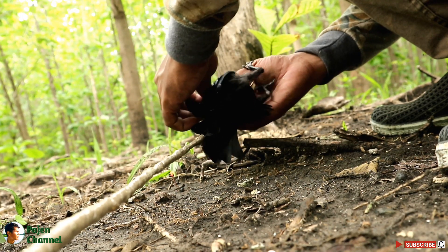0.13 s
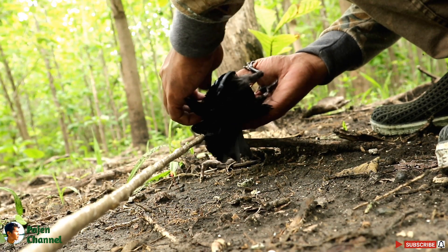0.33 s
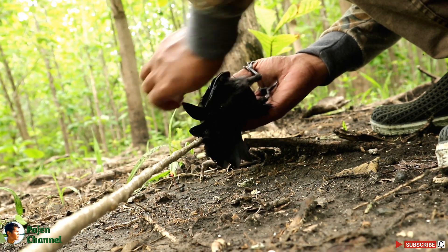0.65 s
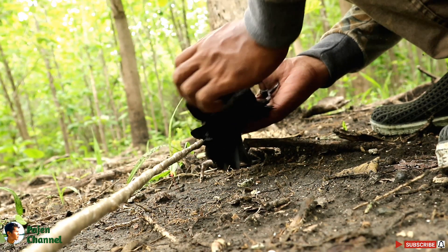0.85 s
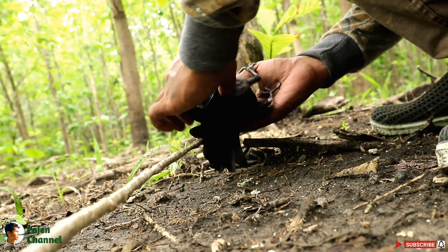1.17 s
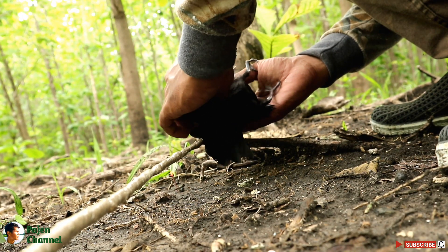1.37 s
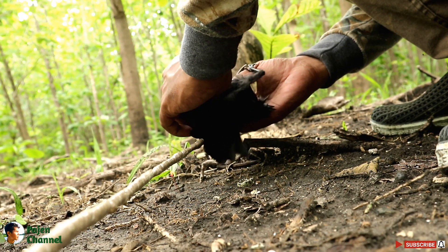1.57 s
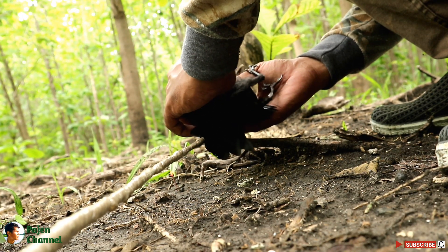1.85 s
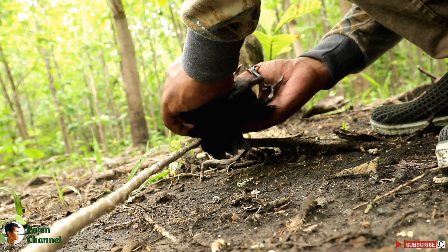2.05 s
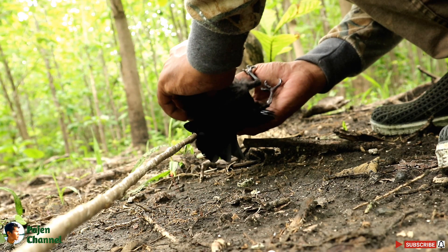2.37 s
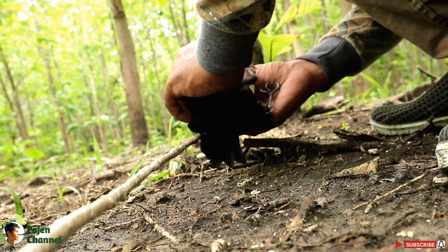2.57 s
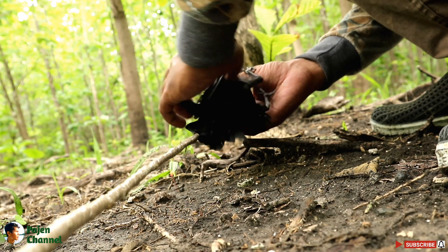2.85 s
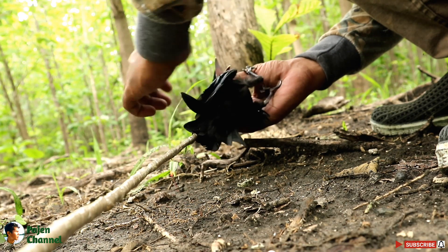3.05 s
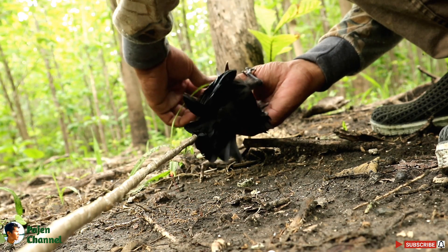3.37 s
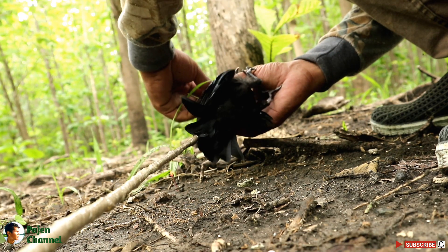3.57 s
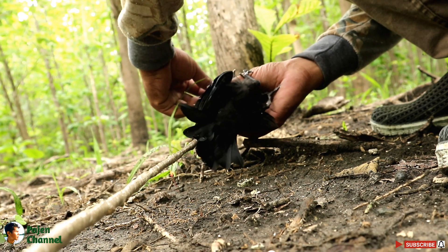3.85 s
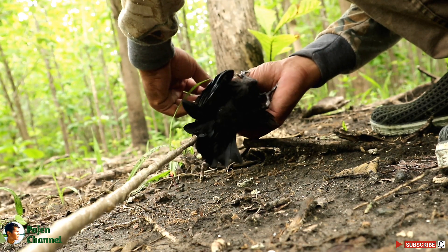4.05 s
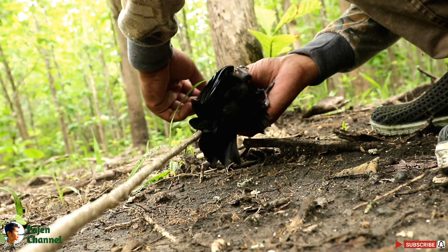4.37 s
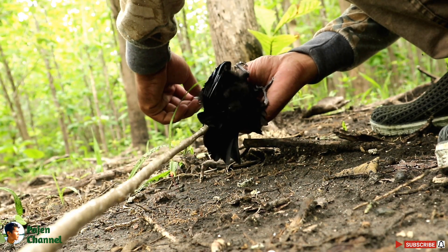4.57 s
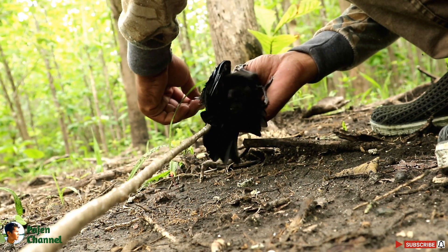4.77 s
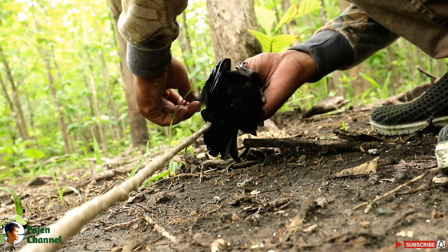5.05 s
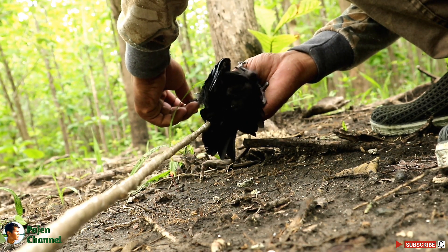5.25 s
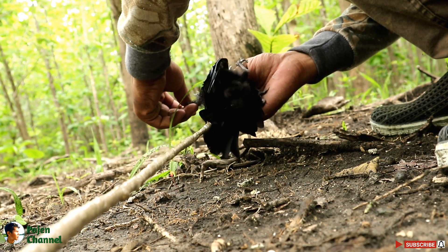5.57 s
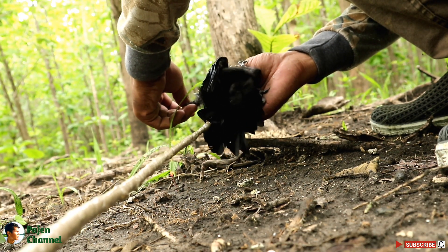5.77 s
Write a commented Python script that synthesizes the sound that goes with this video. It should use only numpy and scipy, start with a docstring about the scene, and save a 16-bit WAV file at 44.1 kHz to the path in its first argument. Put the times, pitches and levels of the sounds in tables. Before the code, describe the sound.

Outdoors in a wood, in stereo, a young bird held near the ground squawks about a step from the microphone. The first loud, hoarse call is already sounding at 0 and ends near 0.5 s. Tiny faint chirps flick by at 0.6-0.8 s. Five more squawks follow at about 0.9, 1.55, 2.15, 2.75 and 3.5 s, each roughly 0.4-0.5 s: a buzzing, two-pitched rasp that swells, strains upward late, then drops off abruptly, with a faint scattered echo from the trees. After 3.9 s the bird is quiet. A distant clear whistle falls around 4.0-4.1 s, soft dove-like hoots come at 4.5, 4.8, 5.1 and 5.4 s, and a dull knock near 5.0 s. From 5.2 to 5.6 s a nearer wild bird whistles a short, echoing phrase. Throughout lie low rumble, gentle leaf hiss and a barely audible high insect trill.

```python
"""A wood: a young bird held near the ground squawks six times, a step from a stereo microphone.
Squawk: two pulse trains (both sides of the syrinx) over a chaotic rasp, filtered from calm to strained tone.
Hands, ground and trunks colour or echo it. Wild birds and a dove-like hoot are gliding sines.
Below them: one knock, an insect trill (narrow noise), low rumble and leaf hiss (filtered noise)."""
import sys
import numpy as np
from scipy import signal
from scipy.fft import rfft, irfft
from scipy.io import wavfile
from scipy.ndimage import uniform_filter1d

SR = 44100
rng = np.random.default_rng(int(sys.argv[2]) if len(sys.argv) > 2 else 0)


def invert_db(x):
    """Field ratio 10**(x/20) for x, a level in decibels (scalar or array-like)."""
    u = np.asarray(x, float) / 20
    return 10 ** u


def dump_mix(stems):
    """Bounce the given channels to the path in sys.argv[1] as a 16-bit WAV at rate SR."""
    frames = np.atleast_2d(stems).T  # one column per channel
    limited = np.clip(frames, -1, 1)  # hard clip at full scale
    pcm = np.round(limited * 32767).astype(np.int16)
    wavfile.write(sys.argv[1], SR, pcm)


N = 261072
T = np.arange(N) / SR

# squawks: start t/s, length/s, onset level/dB, peak level/dB (before attack, surge, release),
# swell exponent, top pitch f/Hz, climb time/s
SQUAWKS = [(-0.05, 0.54, -27.5, -15.5, 1.27, 1322, 0.26), (0.922, .374, -31, -19.5, 0.62, 1133, .17),
           (1.555, .48, -35.5, -15, 0.7, 1283, 0.27), (2.167, .405, -27.5, -18, 1.02, 1174, .19),
           (2.768, .521, -29.5, -14, 0.29, 1286, .44), (3.508, 0.37, -22, -18.5, 1.6, 1152, 0.21)]
# per squawk: share of clear voice (0-1, scaled along the climb), lower/upper pitch ratio at the top
VOICING = [(.66, .72), (.5, .68), (.65, .74), (.45, .65), (.78, .765), (.5, .785)]
# tone colour of each squawk, strong partials included, calmer early part: f/Hz, relative density/dB per Hz
CALM_TONE = [
    [(350, -58), (600, -26), (834, -17), (964, -25.5), (1490, -24), (1610, -6.5), (2240, -4.5), (2430, -2),
     (3560, -16), (4280, -1), (6780, -5), (10800, -29.5), (14000, -43)],
    [(350, -59), (600, -30), (990, -37), (1140, -19), (1510, -21), (1860, -6), (2460, -5), (2770, -10.5),
     (3560, -33), (4940, -13.5), (6960, -11.5), (7640, -19.5), (14000, -48.5)],
    [(350, -58), (600, -28.5), (1450, -17.5), (1680, -1.5), (2490, -0.5), (3080, 0), (3510, -26),
     (4940, -0.5), (6270, -17), (6960, -6), (8160, -19.5), (10600, -21), (14000, -45)],
    [(350, -57), (600, -23), (977, -31), (1100, -20), (1510, -15), (1630, -2), (2490, 1.5), (3040, 1.5),
     (3420, -28), (4940, -2.5), (5350, 3), (7540, -18), (14000, -41)],
    [(350, -70), (600, -55), (712, -41), (1470, -13.5), (1790, -6), (2520, -8), (2730, 3.5), (3460, -2.5),
     (4750, -7), (7340, -12), (10800, -55), (12400, -55), (14000, -42)],
    [(350, -67), (600, -30), (1320, -14), (1630, 0), (1990, -1.5), (2490, -1), (3510, -12), (4000, -5.5),
     (4510, 1), (5010, -3.5), (8710, -17.5), (10300, -51), (14000, -40)],
]
# tone colour of each squawk, strong partials included, strained late part: f/Hz, relative density/dB per Hz
STRAINED_TONE = [
    [(350, -62), (600, -38), (1030, -19.5), (1210, -9.5), (1490, -20), (2460, -5.5), (2800, -1), (5490, 2),
     (7840, -5), (10800, -17.5), (12600, -39), (13100, -87), (14000, -82)],
    [(350, -55), (600, -30), (676, -50), (731, -36), (1070, -22.5), (2180, -14), (2700, -11.5), (4880, -1),
     (6960, -14.5), (10600, -25.5), (12300, -69), (13100, -86), (14000, -47)],
    [(350, -66), (600, -31), (964, -31), (1240, -11), (2180, -16), (2390, -16), (3510, -2.5), (4750, 5),
     (6270, -11), (7050, -3), (7740, -15.5), (11300, -26), (14000, -50)],
    [(350, -72), (600, -42), (761, -28), (952, -30), (1140, -13), (1270, -14.5), (2300, -13), (3080, -6),
     (3460, -7.5), (4690, 2.5), (5350, -12), (7150, -14), (14000, -43)],
    [(350, -69), (600, -64), (781, -32), (964, -20.5), (1260, -16.5), (1530, -16), (1940, -9),
     (2100, -11.5), (3560, -9), (4630, -2), (10600, -18.5), (13100, -45), (14000, -86)],
    [(350, -58), (600, -17), (1000, -24), (1110, -13), (1360, -13.5), (2240, -6), (2770, -6), (5010, -2),
     (9060, -23.5), (10300, -8), (12100, -36), (12800, -73), (14000, -107)],
]
# dips per squawk where the ground echo cancels the voice: f/Hz, half-width at 1/e depth/Hz, depth/dB
GROUND_DIPS = [
    [(3820, 30, 13), (4930, 120, 8), (9340, 290, 4)],
    [(3920, 110, 4), (5380, 120, 14), (6320, 390, 3), (7600, 290, 10), (9530, 550, 10)],
    [(3300, 66, 17), (5230, 93, 20), (7360, 130, 10), (9900, 170, 14)],
    [(4440, 66, 12), (5350, 175, 21), (6130, 390, 8.5), (6680, 110, 29), (8600, 200, 14)],
    [(3466, 263, 15), (4050, 170, 10.5), (5570, 100, 10)],
    [(2770, 44, 17), (4520, 116, 13), (6500, 78, 14)],
]
# echo off the hands: f/Hz, gain/dB
HAND_ECHO = [(500, -60), (1500, -97), (2500, -13.5), (4000, -13.5), (6000, -7.5), (9000, -1.5), (14000, 3)]
# foliage reflection: f/Hz, gain/dB
LEAVES = [(1000, -11.5), (3000, 5), (6000, 0.5), (9000, 1.5), (12000, 7)]
# trunk echoes: f/Hz, t60/s (late decay), relative strength/dB
TRUNKS = [(301, 0.47, 4), (1200, 0.78, 13), (2500, 0.91, 2.5), (5000, 0.99, 1.5), (7500, 0.57, 2.5),
          (11000, 0.32, 6.5)]
# song of a near wild bird, one list per note: t/s, f/Hz, relative level/dB
SONG = [
    [(5.228, 2700, -48), (5.252, 3800, -38.5), (5.28, 3820, -36.5), (5.325, 3840, -43),
     (5.338, 3850, -22.5), (5.352, 3830, -27), (5.375, 3550, -34.5), (5.392, 2650, -29.5),
     (5.405, 2400, -46)],
    [(5.28, 1880, -44), (5.3, 1848, -41), (5.34, 1885, -47), (5.36, 1885, -36), (5.38, 1860, -53)],
    [(5.485, 1865, -42), (5.5, 1880, -24), (5.53, 1925, -25.5), (5.545, 2150, -20.5), (5.57, 2530, -22),
     (5.6, 2560, -24.5), (5.62, 2550, -24.5)],
]
# air rushing past the whistle: f/Hz, relative level/dB
AIR = [(4000, -0.5), (5500, 1), (8000, -6), (11000, 1.5), (12000, -15)]
# further whistles: start t/s, length/s, from f/Hz, to f/Hz, relative level/dB, left minus right/dB
WHISTLES = [(.59, 0.15, 2240, 2123, -55, 1), (0.724, 0.01, 4220, 3560, -49, 4),
            (0.77, 0.014, 3820, 4240, -50, 2), (0.772, 0.0152, 2410, 3680, -46, 0),
            (0.72, 0.13, 1797, 1740, -62, 6), (0.805, 0.024, 3940, 2400, -45.5, 0),
            (2.725, 0.068, 4750, 4210, -49.5, 10), (3.918, 0.017, 4060, 2770, -41, 7),
            (4.095, 0.052, 2200, 1372, -53, 3), (4.246, .03, 6400, 5600, -59, 0),
            (4.52, 0.05, 6970, 5600, -60, -6), (4.671, 0.033, 5600, 6500, -59, 2),
            (5.091, 0.117, 4410, 4290, -62, 0), (5.237, 0.012, 1920, 2500, -44, 0),
            (5.249, 0.014, 2800, 3300, -41, 4), (5.617, 0.034, 3470, 2690, -39, 6)]
# long falling whistle further off: t/s, f/Hz, relative level/dB
FALL = [(3.985, 5150, -61), (4.02, 4560, -56), (4.05, 4050, -46), (4.075, 3560, -40), (4.095, 3050, -43),
        (4.115, 2480, -50.5)]
# dove-like hoots: start t/s, relative level/dB
HOOTS = [(4.502, -58), (4.813, -56), (5.085, -54), (5.386, -57.5)]
# forest hush, mid: f/Hz, relative density/dB per Hz
HUSH = [(15, -55), (25, -30.5), (75, 3.5), (105, 0.5), (133, -7.5), (333, -13.5), (361, -14.5),
        (1000, -18.5), (1780, -21.5), (1980, -20), (3700, -26.5), (4450, -26.5), (7120, -32.5),
        (12000, -45.5), (13000, -47)]
# forest hush: f/Hz, side minus mid/dB
HUSH_SIDE = [(60, -31), (110, -14.5), (200, -2), (380, 2), (690, 3), (1270, 3.5), (2350, 0.5), (4320, 3.5),
             (7970, 6), (14700, 10)]

ATTACK_S, ATTACK_DB, RELEASE_S, RELEASE_DB = 0.015, -15, 0.04, -27
REST_HZ, CLIMB_BEND, LET_GO_S, SAG_HZ_PER_S, ARCH_S = 810, 1.45, 0.052, 4200, 0.02
SURGE_DB, SURGE_FROM_CLIMB, SURGE_FULL_CLIMB = 3.5, 0.78, 0.88
LOWER_RATIO_AT_REST = 0.76
# along the climb: rest, middle, top
LOWER_VOICE_DB, CLARITY_FACTOR = [-1, -12, -1], [0.4, 0.9, 0.85]
STRAIN_REST, STRAIN_TOP = 0.33, 0.6  # 0 calm tone, 1 strained tone


def level(x, rms_db):
    """Scale to an rms level."""
    return x * invert_db(rms_db) / np.sqrt(np.mean(x ** 2))


def along(table, hz):
    """Read (f/Hz, value) points on a log-frequency axis."""
    f, value = np.transpose(table)
    return np.interp(np.log(hz + 1), np.log(f), value)


def colour(x, table):
    """Filter by (f/Hz, gain/dB) points."""
    n = x.shape[-1]
    gain = invert_db(along(table, np.arange(n // 2 + 1) * SR / n))
    return irfft(rfft(x) * gain, n)


def wander(n, rate_hz):
    """Smooth random curve of rms 1, changing about rate_hz times a second."""
    k = max(int(SR / rate_hz), 2)
    return level(uniform_filter1d(uniform_filter1d(rng.standard_normal(n), k), k), 0)


def pulses(hz, jitter, wobble, scatter_db):
    """A membrane snaps shut once a cycle; its period and strength waver fast, its pitch wobbles slower."""
    unsteady = jitter * wander(len(hz), 1200) + wobble * wander(len(hz), 70.57)
    phase = 2 * np.pi * np.cumsum(hz * np.exp(unsteady)) / SR
    orders = np.arange(1, 17)[:, None]
    smear_rad = 0.25 * orders ** 2  # blunts the pulse
    audible = orders * hz < 15500
    train = np.sum(np.cos(orders * phase + smear_rad) * audible, axis=0)
    even = np.sqrt(hz / 1000)  # same power per Hz at any pitch
    return -even * invert_db(scatter_db * wander(len(hz), 1500)) * train


def squawk(t, length_s, onset_db, peak_db, swell_bend, top_hz, climb_s):
    """Level/dB, pitch/Hz, climb (0 rest, 1 top): swells, climbs late, surges, then lets go."""
    swell = np.clip(t / (length_s - RELEASE_S), 0, 1) ** swell_bend
    db = onset_db + (peak_db - onset_db) * swell
    db = db + ATTACK_DB * np.clip(1 - t / ATTACK_S, 0, 1)
    db = db + RELEASE_DB * np.clip(1 - (length_s - t) / RELEASE_S, 0, 1) ** 1.96
    late_s = t - (length_s - LET_GO_S)
    climb = np.clip(1 + late_s / climb_s, 0, 1)
    db = db + SURGE_DB * np.interp(climb, [SURGE_FROM_CLIMB, SURGE_FULL_CLIMB], [0, 1])
    hz = REST_HZ + (top_hz - REST_HZ) * climb ** CLIMB_BEND
    hz = hz - SAG_HZ_PER_S * np.clip(late_s, 0, None)
    return db, uniform_filter1d(hz, int(ARCH_S * SR), mode="nearest"), climb


def ground(x, dips):
    """The ground echo cancels narrow bands: bell-shaped dips in the spectrum."""
    f = np.arange(len(x) // 2 + 1) * SR / len(x)
    cut_db = sum(db * np.exp(-((f - hz) / width_hz) ** 2) for hz, width_hz, db in dips)
    return irfft(rfft(x) * invert_db(-cut_db), len(x))


def syrinx(hz, climb, clarity, lower_at_top):
    """Two voices, the lower below the upper by a ratio that slides from its rest value to the squawk's top
    value as the call climbs, each wavering on its own, plus a chaotic rasp."""
    lower_hz = hz * (LOWER_RATIO_AT_REST + (lower_at_top - LOWER_RATIO_AT_REST) * climb)
    lower_db = np.interp(climb, [0, 0.5, 1], LOWER_VOICE_DB)
    clear = clarity * np.interp(climb, [0, 0.5, 1], CLARITY_FACTOR)
    voices = pulses(hz, 0.036, 0.008, 1.5) + invert_db(lower_db) * pulses(lower_hz, 0.036, 0.01, 1.0)
    voices = voices * invert_db(2.0 * wander(len(hz), 30))  # the clear tones come and go
    # the membranes lose their rhythm
    rasp = pulses(1.3 * hz, 0.35, 0.05, 2.4) + 2.1 * rng.standard_normal(len(hz))
    return np.sqrt(clear) * level(voices, 0) + np.sqrt(1 - clear) * level(rasp, 0)


def fledgling():
    """Six syrinx calls, tone blending from calm towards strained; with and without the ground dips."""
    out = np.zeros((2, N))
    rows = zip(SQUAWKS, VOICING, CALM_TONE, STRAINED_TONE, GROUND_DIPS)
    for (start_s, length_s, *shape), (clarity, lower_at_top), calm, strained, dips in rows:
        a, b = max(int(start_s * SR), 0), int((start_s + length_s) * SR)
        db, hz, climb = squawk(T[a:b] - start_s, length_s, *shape)
        source = syrinx(hz, climb, clarity, lower_at_top)
        strain = np.clip(STRAIN_REST + (STRAIN_TOP - STRAIN_REST) * climb, 0, 1)
        call = (1 - strain) * level(colour(source, calm), 0) + strain * level(colour(source, strained), 0)
        heard = ground(call, dips)
        envelope = np.sqrt(uniform_filter1d(heard ** 2, size=3000) + 1e-12)
        end_fade = np.clip((T[b] - T[a:b]) / 0.004, 0, 1)
        out[:, a:b] = np.array([heard, call]) * invert_db(db) * end_fade / envelope
    return out


def hands(bird):
    """Echo off the moving hands, opposite in sign left and right; lag drifts, strength flutters."""
    lag_s = 0.000407 * np.exp(0.15 * wander(N, 3.6))
    echo = np.interp(T - lag_s, T, colour(bird, HAND_ECHO))
    return echo * (1 + 0.79 * wander(N, 116)) * np.array([[1], [-1]])


def trunks(x, rise_s, width, early_db, early_s):
    """Scattered echoes off trunks and leaves: decaying noise with an early boost, decay set by band."""
    t, tail, table = T[:int(1.5 * SR)], 0, np.array(TRUNKS)
    noise = rng.standard_normal((2, len(t)))
    for hz in 250 * 2. ** np.arange(0, 6.1, 0.5):
        skirts = [(hz / 1.42, -60), (hz / 1.2, -3), (hz, 0), (hz * 1.2, -3), (hz * 1.42, -60)]
        t60_s = along(table[:, :2], hz)
        tail = tail + colour(noise, skirts) * invert_db(along(table[:, ::2], hz) - 60 * t / t60_s)
    tail = tail * np.clip(t / rise_s, 0, 1) * invert_db(early_db * np.exp(-t / early_s))
    stereo = tail[0] + width * tail[1] * np.array([[1], [-1]])
    stereo = stereo / np.sqrt(np.sum(tail[0] ** 2))
    return signal.fftconvolve(x[None], stereo, axes=1)[:, :N]


def note(s, hz, db, hoarse=1):
    """Whistled note: a sine; if hoarse, also a weak noisy 4th harmonic and rushing air."""
    pitch_hz = np.interp(T, s, hz)
    phase = 2 * np.pi * np.cumsum(pitch_hz) / SR
    air = level(colour(rng.standard_normal(N), AIR), -28.5)
    overtone = invert_db(-33) * np.sin(4 * phase) * wander(N, 700) * (4 * pitch_hz < 11500)
    fade = np.clip(np.minimum(T - s[0], s[-1] - T) / 0.0017, 0, 1)
    return np.sqrt(2) * (np.sin(phase) + hoarse * (overtone + air)) * invert_db(np.interp(T, s, db)) * fade


def wild_song():
    """Song of the near wild bird: hoarse whistled notes, two of them overlapping."""
    return sum(note(*np.transpose(rows)) for rows in SONG)


def glides(rows):
    """Sines with straight pitch glides that swell and fade, each panned by level."""
    out = np.zeros((2, N))
    for start_s, length_s, hz, end_hz, db, pan_db in rows:
        u = np.arange(int(length_s * SR)) / (length_s * SR)
        phase = 2 * np.pi * np.cumsum(hz + (end_hz - hz) * u) / SR
        glide = np.sin(phase) * np.sqrt(np.sin(np.pi * u))
        a = int(start_s * SR)
        out[:, a:a + len(u)] += glide * invert_db(db + np.array([[pan_db], [-pan_db]]) / 2)
    return out


def whistles():
    """Further birds: short glides and one long clear fall, 3 dB stronger on the left."""
    fall = note(*np.transpose(FALL), hoarse=0)
    return glides(WHISTLES) + fall * invert_db(np.array([[1.5], [-1.5]]))


def hoots():
    """Dove-like hoots: short sines sagging from 342 to 321 Hz, 2 dB stronger on the right."""
    return glides([(start_s, 0.071, 342, 321, db, -2) for start_s, db in HOOTS])


def knock():
    """One soft knock on the ground: a sine with exponential decay."""
    start_s, hz, peak_db, t60_s = 4.98, 420, -39, 0.045
    u = np.clip(T - start_s, 0, None)
    return invert_db(peak_db - 60 * u / t60_s) * np.sin(2 * np.pi * hz * u)


def insect():
    """Insect trill: narrow noise near 7 kHz, unrelated left and right, with a flickering level."""
    band = [(6500, -40), (6900, -4), (7050, 0), (7200, -6), (7500, -40)]
    trill = colour(rng.standard_normal((2, N)), band)
    return level(trill, -64.0) * invert_db(1.5 * wander(N, 12.0))


def hush():
    """Forest hush: noise, its rumble mostly alike in both channels, its leaf hiss mostly unrelated."""
    mid, side = colour(rng.standard_normal((2, N)), HUSH) * invert_db(0.16 * wander(N, 4.8))
    bed = mid + colour(side, HUSH_SIDE) * np.array([[1], [-1]])
    return bed * invert_db(-45.5) / np.std(mid)


def scene():
    """Near bird mostly dry, wild birds mostly echo."""
    bird, open_air = fledgling()
    song = wild_song()
    far = whistles() + hoots()
    bird_echo = trunks(colour(open_air, LEAVES), rise_s=0.01, width=0.58, early_db=18.0, early_s=0.24)
    song_echo = trunks(song, rise_s=0.008, width=0.36, early_db=15.5, early_s=0.1)
    far_echo = trunks(far.mean(axis=0), rise_s=0.0093, width=0.57, early_db=1.6, early_s=0.035)
    near = bird + hands(bird) + invert_db(-19.5) * bird_echo
    singer = song * invert_db(np.array([[-2.5], [-4.5]])) + invert_db(-1.5) * song_echo
    others = invert_db(3.0) * far + invert_db(6.5) * far_echo
    return near + singer + others + knock() + insect() + hush()


def top_cut(x):
    """Nothing passes above the cut-off."""
    return signal.sosfilt(signal.butter(12, 15280, fs=SR, output="sos"), x)


def record(dry):
    """The preamp rounds the loudest peaks."""
    mix = 0.89 * np.tanh(dry / 0.93)
    return top_cut(mix)


dry = scene()
out = record(dry)
dump_mix(out)
```